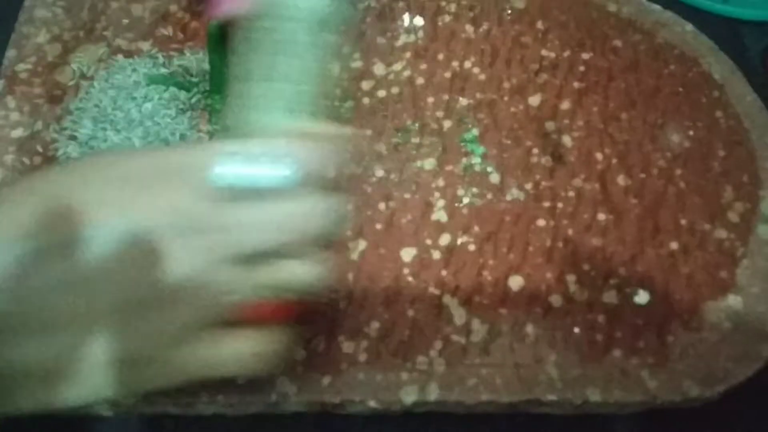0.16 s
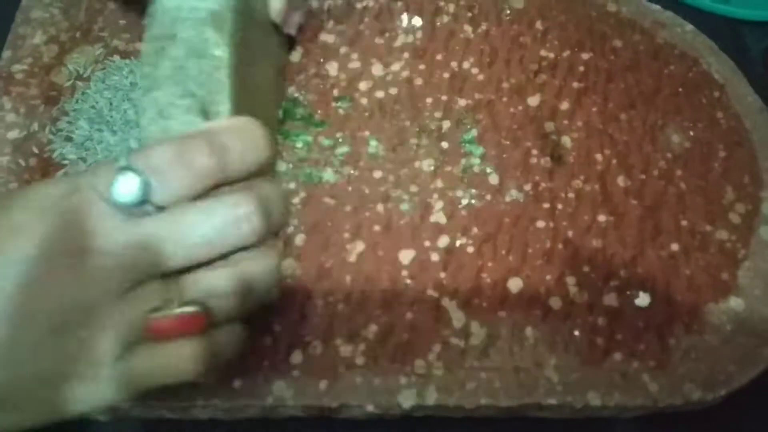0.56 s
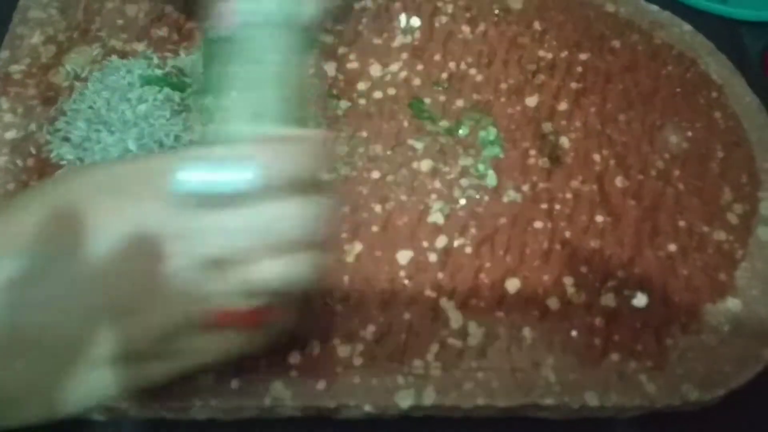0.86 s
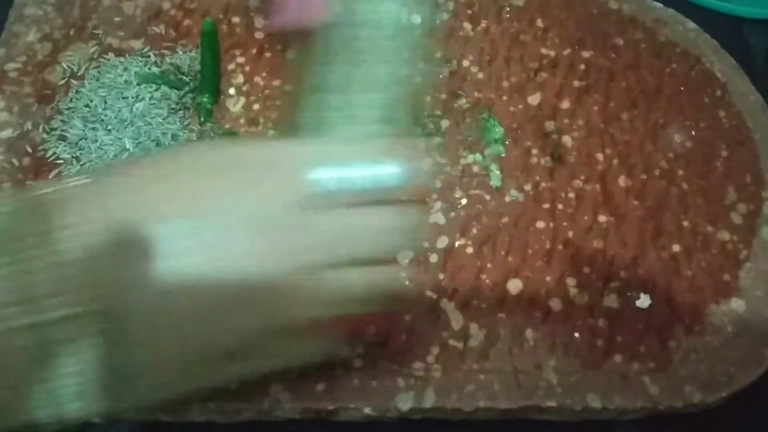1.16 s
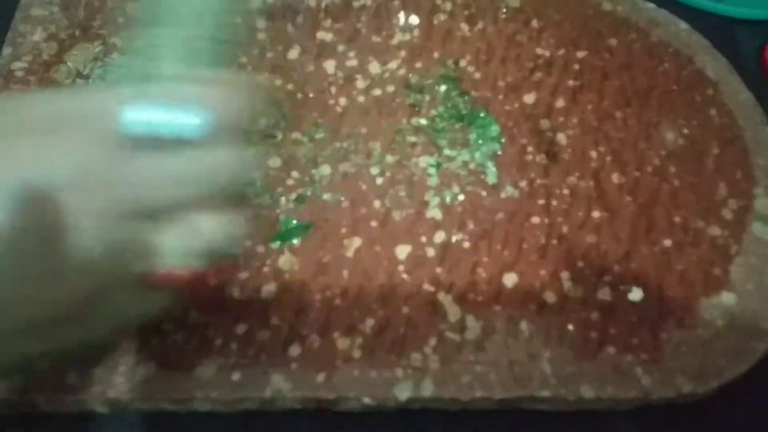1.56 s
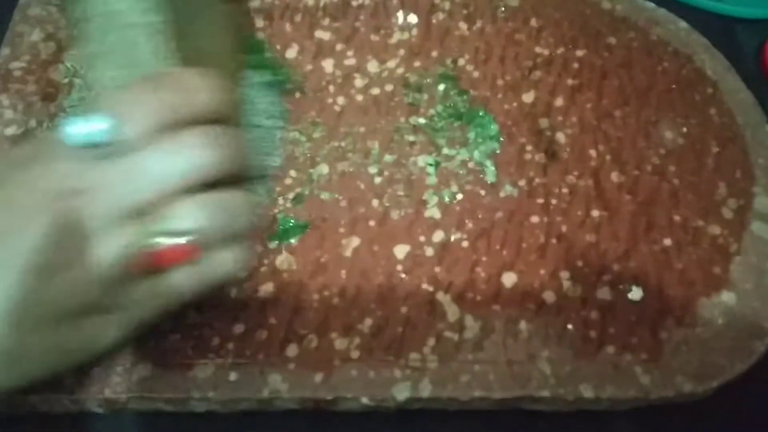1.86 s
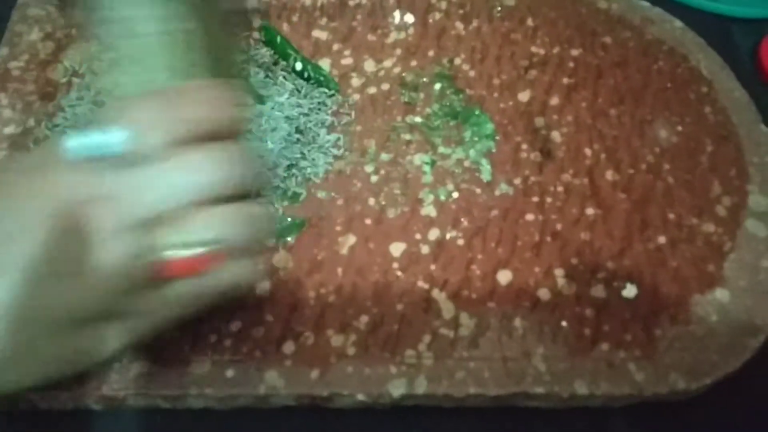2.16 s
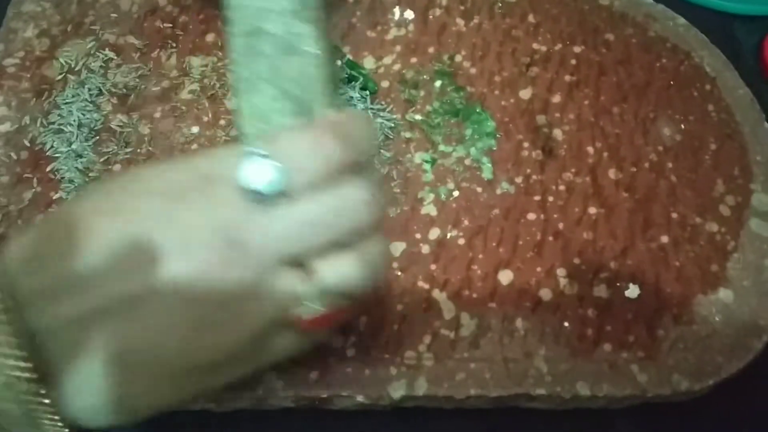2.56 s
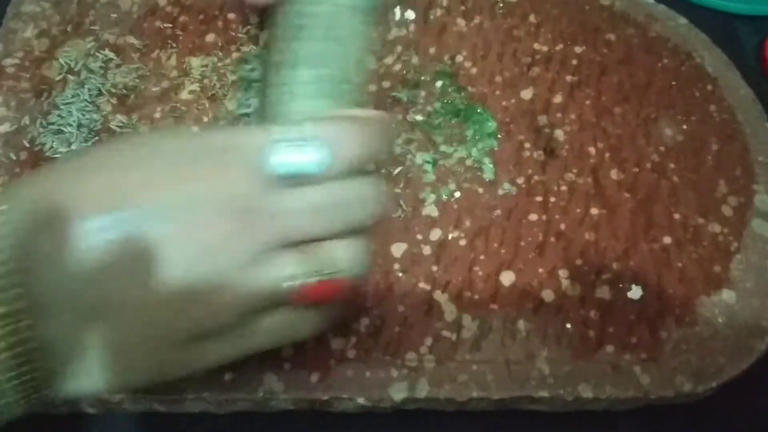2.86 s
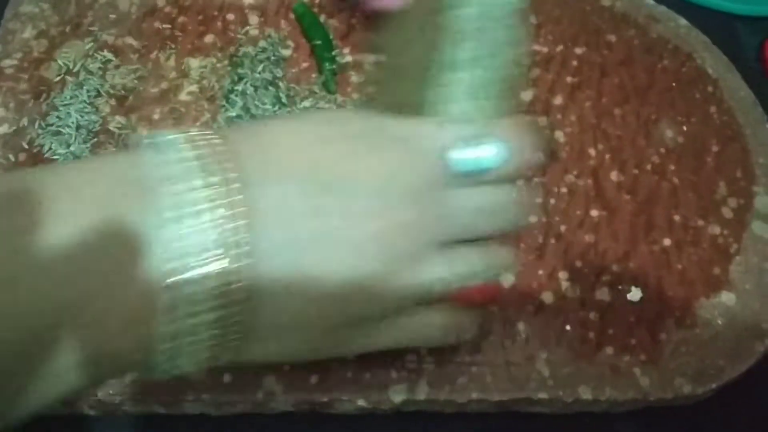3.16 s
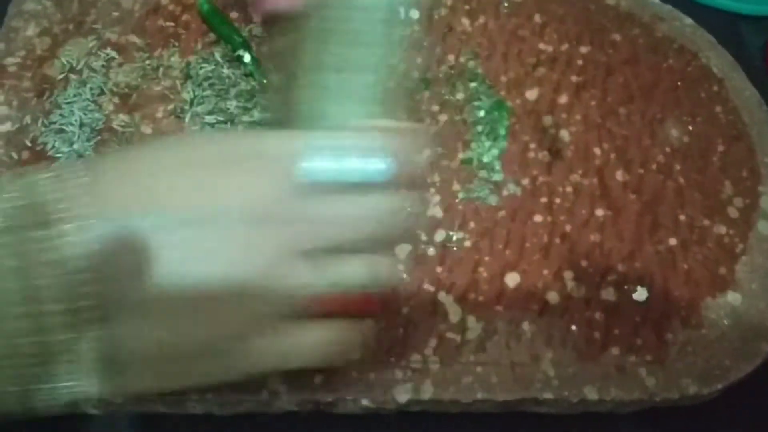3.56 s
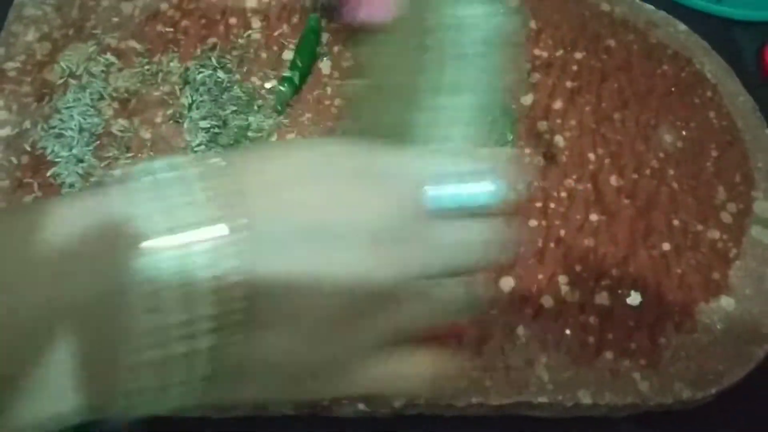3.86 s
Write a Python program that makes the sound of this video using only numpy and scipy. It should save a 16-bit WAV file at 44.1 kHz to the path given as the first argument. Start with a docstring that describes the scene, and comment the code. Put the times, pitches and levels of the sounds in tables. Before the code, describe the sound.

Quick, gritty strokes of stone on stone crush spices in a small, faintly humming kitchen. After a short break and a clack, the grinding carries on, stumbles into soft thuds, then grows raspier as seeds crack.

```python
"""A stone muller grinds spices on a stone slab in a small kitchen, over a low room hum and rumble.
From the start each stroke swells and fades: grit rasps, the stones ring faintly, the slab thrums on the
counter, and on thinly covered stone the muller chatters and knocks. Near 1.5 s it is lifted, then set
down with a clack. The grinding resumes, stumbles into soft thuds and chatter around 2.5 s,
and ends in firmer, raspier strokes with seeds cracking under the stone."""
import sys
import numpy as np
from scipy import signal
from scipy.fft import rfft, irfft, next_fast_len
from scipy.io import wavfile
from scipy.ndimage import uniform_filter1d

SR = 44100
rng = np.random.default_rng(int(sys.argv[2]) if len(sys.argv) > 2 else 0)


def master_out(mix):
    """Clip the mix to full scale and print it as 16-bit PCM to the path in sys.argv[1]."""
    frames = np.transpose(np.atleast_2d(mix))
    ceiling = np.clip(frames, -1, 1)
    pcm = np.round(ceiling * 32767).astype(np.int16)
    wavfile.write(sys.argv[1], SR, pcm)


N = 176400

# room tone spectrum: f/Hz, relative level/dB
ROOM_TONE_EQ = [(15, -17.5), (28, 19), (45, -21.5), (65, -40), (88, 10.5), (130, -14), (210, -8),
                (320, -34), (650, -18), (1500, -27.5), (3000, -36.5), (9000, -29), (16000, -44)]
# deep rumble spectrum: f/Hz, relative level/dB
RUMBLE_EQ = [(10, -40), (22, -23), (29, -12), (42, -30), (70, -13), (200, -41)]
# rise and fall of the rumble: t/s, level/dB
RUMBLE_FADER = [(0, -52), (1.4, -53), (1.6, -61), (2.3, -53), (2.58, -43), (2.8, -51), (3.3, -51.5),
                (4, -55)]
# kitchen reverb decay: f/Hz, t60/s
REVERB_DECAY = [(150, 0.56), (800, 0.46), (2000, 0.12), (6000, 0.12), (15000, 0.13)]
# muller strokes: start/s, end/s, top speed at/fraction of stroke, rasp/dB, ring/dB, thrum/dB, chatter/dB
MULLER_STROKES = [(-.12, 0.067, .5, -30.5, -46, -38, -51), (0.056, 0.228, 0.31, -33.5, -36.5, -39, -32.5),
                  (0.224, 0.416, 0.38, -25, -43.5, -38, -41.5), (0.407, 0.57, 0.41, -32, -46, -44, -38),
                  (0.536, 0.758, 0.52, -27.5, -42.5, -41, -73), (0.74, 0.906, 0.43, -27.5, -36, -44, -32),
                  (0.895, 1.085, 0.46, -27, -39, -36, -68), (1.064, 1.232, 0.41, -28, -35, -41.5, -31),
                  (1.21, 1.404, 0.48, -26.5, -40.5, -37.5, -44),
                  (1.397, 1.456, 0.42, -39.5, -42.5, -57, -38), (1.694, 1.935, 0.7, -28.5, -36, -41, -74),
                  (1.94, 2.091, 0.5, -28, -37.5, -40.5, -72), (2.098, 2.263, 0.36, -23, -32.5, -35.5, -74),
                  (2.252, 2.401, 0.48, -28, -37, -36.5, -62), (2.407, 2.633, 0.24, -26, -34.5, -39, -70),
                  (2.5, 2.572, 0.48, -47, -39, -56, -29.5), (2.54, 2.733, 0.57, -44.5, -42.5, -54, -49),
                  (2.723, 2.909, 0.43, -37.5, -48.5, -44.5, -51), (2.916, 3.092, 0.63, -21, -38, -37, -73),
                  (3.092, 3.275, 0.54, -27, -40, -38, -67), (3.276, 3.451, 0.53, -21.5, -38, -35, -76),
                  (3.434, 3.635, 0.61, -29, -43, -38, -79), (3.626, 3.82, 0.39, -21.5, -37.5, -36, -83),
                  (3.797, 4.016, 0.28, -28, -41.5, -39.5, -59)]
# slab shaking on the counter: f/Hz, relative level/dB
THRUM_EQ = [(40, -31), (68, -11.5), (88, 0.5), (115, -11.5), (165, -6), (208, 1.5), (232, -2), (265, -0.5),
            (300, -3.5), (340, -19), (405, -9.5), (520, -21), (710, -19), (1000, -23), (2000, -28)]
# hollow scrape of bare stone: f/Hz, relative level/dB
CHATTER_EQ = [(100, -22), (350, -17), (600, -4), (820, 4), (1000, -4), (1300, -14.5), (1600, -11.5),
              (2000, -21.5), (2800, -13.5), (4000, -17), (7000, -14)]
# ringing modes of the stones: f/Hz, relative level/dB, t60/s
STONE_MODES = [(199, -34, 0.053), (432, -26, 0.035), (450, -23.5, 0.024), (739.5, -25.5, 0.072),
               (854, -25.5, 0.058), (1142, -11, 0.011), (1276, -18.5, 0.019), (1600, -0.5, 0.024),
               (1765, 2, 0.0088), (1787, -21.5, 0.02), (2200, -14, 0.027), (2966, -2.5, 0.016),
               (4100, -6, 0.0055), (4730, -3.5, .013)]
# stereo width of the ring: f/Hz, lag of the right side/rad
RING_LAG = [(0, -3.5), (800, 1), (1150, -0.1), (1500, -2), (1720, -1.5), (2000, -1.7), (2300, 1.6),
            (3100, 2.1), (4300, -0.9)]
# how rubbing feeds the modes: f/Hz, relative level/dB
RUB_EQ = [(200, -6), (700, 8), (1100, -3.5), (1600, -0.5), (1900, 0.5), (2220, 5), (2700, -4.5),
          (4500, -0.5)]
# stone-on-stone hits, long contacts being soft thuds: t/s, level/dB, contact time/s
STONE_HITS = [(0.085, -21, 0.00032), (0.4448, -20.5, 0.00019), (0.4726, -8.5, 0.00017),
              (0.4747, -7.5, 0.00012), (.4776, -24, 0.00018), (0.4883, -13, 0.00011),
              (0.4954, -40, 0.000088), (0.5674, -12.5, 0.000044), (.789, -14, 0.00011),
              (1.2925, -9.5, 0.00026), (1.3606, -15.5, 0.00024), (1.6879, -2, 0.000084),
              (2.149, -24, 0.00035), (2.159, -20.5, 0.00065), (2.445, -22.5, 0.0007),
              (2.472, -16.5, 0.00065), (2.474, -28, 0.0006), (2.513, -16, 0.00014), (2.794, -21, 0.00011),
              (2.9491, -16, 0.000011), (3.858, -23, 0.00014)]
# skid after a hit: f/Hz, relative level/dB
SKID_EQ = [(100, -16.5), (350, -9), (700, 4.5), (1200, -2), (1650, 2), (2200, -3.5), (3100, -7.5),
           (4500, -29), (8000, -34)]
# seeds cracking: t/s, level before the rasp EQ/dB
SEED_CRACKS = [(0.228, -27.5), (.431, -26), (0.566, -20), (0.94, -29), (1.378, -26), (1.6843, -24),
               (1.799, -34), (1.861, -14), (2.1175, -25), (2.4308, -22.5), (2.4455, -24), (2.7177, -19),
               (2.731, -34), (2.761, -38), (2.928, -29), (2.9473, -15.5), (3.007, -9.5), (3.1234, -21),
               (3.174, -28.5), (3.3125, -19.5), (3.384, -28), (3.649, -20.5), (3.8533, -19), (3.942, -22.5)]
# spectrum of crushed grit: f/Hz, relative level/dB
RASP_EQ = [(300, -42), (1200, -20), (2700, -18.5), (3400, -12), (4300, -3), (5300, -10), (6500, -4),
           (8000, -0.5), (9700, 4), (11000, -2), (12800, -8), (15800, -5.5)]
# stereo lean of the rasp: f/Hz, left minus right/dB
RASP_PAN = [(1000, 10.5), (4400, -1.5), (8000, -3.5), (10000, 1), (15000, 1)]

GRIT_PER_S, BUMPS_PER_S, SKIPS_PER_S = 18000, 2500, 1100
BUMP_SPREAD_DB, SKIP_SPREAD_DB, SKIP_SHARED = 3.5, 2, 0.77


def amp(db):
    """Decibels to gain."""
    return 10 ** (np.asarray(db) / 20)


def unit(x):
    """Scales to an rms of one."""
    return x / np.sqrt(np.mean(x ** 2) + 1e-20)


def curve_at(points, hz):
    """Reads a table on a log-frequency axis."""
    f, value = np.transpose(points)
    return np.interp(np.log(hz + 1), np.log(f + 1), value)


def add(mix, s, sound):
    """Mixes a sound in at s seconds."""
    part = mix[..., round(s * SR):][..., :sound.shape[-1]]
    part += sound[..., :part.shape[-1]]


def convolve(x, response):
    """Plays a signal through a response, channel by channel."""
    return signal.fftconvolve(np.atleast_2d(x), np.atleast_2d(response), axes=1)[:, :N]


def eq(x, points, size=4096):
    """Minimum-phase EQ along the given curve."""
    log_gain = np.log(amp(curve_at(points, abs(np.fft.fftfreq(size, 1 / SR)))))
    response = np.fft.ifft(np.exp(signal.hilbert(log_gain).conj())).real
    return convolve(x, response[:size // 2])


def wobble(smooth_s):
    """Smooth random modulation with an rms of one."""
    return unit(signal.fftconvolve(rng.standard_normal(N), np.hanning(int(2 * smooth_s * SR)), "same"))


def grains(per_s, spread_db):
    """Random clicks of either sign, many small and a few large."""
    size = amp(spread_db * np.minimum(rng.exponential(1, N), 5))
    return unit(size * rng.choice([-1, 1], N) * (rng.random(N) < per_s / SR))


def stereo_grains(per_s, spread_db, shared):
    """Clicks with a share of their power in the centre."""
    left, right, centre = (grains(per_s, spread_db) for _ in range(3))
    return np.sqrt(1 - shared) * np.array([left, right]) + np.sqrt(shared) * centre


def room_tone(air_db=-50.5, mono_below_hz=600):
    """A bed of steady humming noise, mono in the bass, over a deep rumble."""
    spectrum = rfft(rng.standard_normal((2, N)))
    bass = np.fft.rfftfreq(N, 1 / SR) < mono_below_hz
    air = unit(eq(irfft(np.where(bass, spectrum[0], spectrum), N), ROOM_TONE_EQ))
    rumble = unit(eq(rng.standard_normal(N), RUMBLE_EQ, size=16384))
    rumble_db = np.interp(np.arange(N) / SR, *np.transpose(RUMBLE_FADER))
    return amp(air_db) * air + amp(rumble_db) * rumble


def kitchen_reverb(send, predelay_s=0.0041, mono_below_hz=900):
    """Kitchen reflections: sparse random taps, the treble dying first."""
    taps = rng.standard_normal((2, SR // 2)) * (rng.random((2, SR // 2)) < .1)
    hz, t, spectra = signal.stft(taps, SR, nperseg=256)
    tail = signal.istft(spectra * amp(-60 * t / curve_at(REVERB_DECAY, hz)[:, None]), SR)[1]
    tail = np.pad(tail, ((0, 0), (round(predelay_s * SR), 0)))
    bass = signal.sosfilt(signal.butter(2, mono_below_hz, fs=SR, output="sos"), tail[0])
    tail = bass + signal.sosfilt(signal.butter(2, mono_below_hz, "high", fs=SR, output="sos"), tail)
    return convolve(send, tail / np.linalg.norm(tail, axis=1, keepdims=True))


def stroke_envelope(levels_db, follow, swell_db=32.5, shape=2.406, edge_s=0.0065, pressure_db=1.3):
    """Strokes peak at top speed and drop follow * swell_db to the turn, under uneven hand pressure."""
    t, power = np.arange(N) / SR, np.zeros(N)
    for (start, end, top, *_), db in zip(MULLER_STROKES, levels_db):
        off_peak = abs(np.interp(t, [start, start + top * (end - start), end], [-1, 0, 1]))
        gate = np.clip(np.minimum(t - start, end - t) / edge_s + 1, 0, 1)
        power += (gate * amp(db - follow * swell_db * off_peak ** shape)) ** 2
    return np.sqrt(power) * amp(pressure_db * wobble(smooth_s=0.019))


def contact_drift(x, depth_db=3.5, width_hz=380, drift_s=.045, size=512):
    """Peaks and dips wander through the spectrum as the contact patch moves."""
    spectra = signal.stft(x, nperseg=size)[2]
    ripple = rng.standard_normal(spectra.shape[1:])
    for axis, width in enumerate((width_hz * size / SR, drift_s * SR / (size / 2))):
        for span in (width, width / 2):
            ripple = uniform_filter1d(ripple, round(span), axis)
    return unit(signal.istft(spectra * amp(depth_db * unit(ripple)))[1][:, :N])


def slab_thrum(levels_db):
    """The low end: the heavy slab shakes on the counter under each stroke."""
    body = unit(eq(grains(BUMPS_PER_S, BUMP_SPREAD_DB), THRUM_EQ))
    return body * stroke_envelope(levels_db, follow=0.73)


def muller_chatter(levels_db):
    """On bare patches the muller skips with a coarse, hollow scrape."""
    scrape = eq(stereo_grains(SKIPS_PER_S, SKIP_SPREAD_DB, SKIP_SHARED), CHATTER_EQ)
    return contact_drift(scrape) * stroke_envelope(levels_db, follow=1)


def stone_ring(contact_s, spread_db=2.5, detune=0.013):
    """The stones ring from one blow, a little differently at each spot; a longer contact is duller."""
    t = np.arange(SR // 8) / SR
    ring = np.zeros(len(t))
    for k, (hz, db, t60) in enumerate(STONE_MODES):
        decay = amp(db + spread_db * rng.standard_normal() - 60 * t / t60)
        pitch_hz = hz * (1 + detune * rng.standard_normal())
        ring += (-1) ** k * decay * np.sin(2 * np.pi * pitch_hz * t)
    force = t * np.exp(-t / contact_s)
    left = convolve(ring, force)[0, :len(t)]
    size = next_fast_len(2 * len(t))
    lag = curve_at(RING_LAG, np.fft.rfftfreq(size, 1 / SR))
    right = irfft(rfft(left, size) * np.exp(-1j * lag), size)[:len(t)]
    stereo = np.array([left, right])
    return stereo / abs(stereo).max()


def stone_rub(levels_db, contacts=3):
    """Fine bumps at several points of contact keep the stones ringing."""
    ring = sum(convolve(grains(BUMPS_PER_S / contacts, BUMP_SPREAD_DB), stone_ring(contact_s=.00007))
               for _ in range(contacts))
    return unit(eq(ring, RUB_EQ)) * stroke_envelope(levels_db, follow=0.92)


def muller_knocks(skid_db=-21, attack_s=.003, decay_s=0.028):
    """The muller rocks or drops onto the slab, each hit trailing a short, quieter skid."""
    hits, skid_level, t = np.zeros((2, N)), np.zeros(N), np.arange(SR // 4) / SR
    skid_shape = np.minimum(t / attack_s, 1) * np.exp(-t / decay_s)
    for s, db, contact_s in STONE_HITS:
        add(hits, s, amp(db) * stone_ring(contact_s))
        add(skid_level, s, amp(db + skid_db) * skid_shape)
    skid = unit(eq(stereo_grains(GRIT_PER_S, SKIP_SPREAD_DB, SKIP_SHARED), SKID_EQ))
    return hits + skid_level * skid


def spice_rasp(levels_db, clump_db=2, coarse_hz=5930, brighten=0.34, pivot_db=-35, crack_decay_s=0.0045):
    """Grit is crushed in small clumps of tiny clicks; now and then a whole seed cracks."""
    clumps = amp(clump_db * wobble(smooth_s=0.0094))
    grit = unit(contact_drift(stereo_grains(GRIT_PER_S, spread_db=3, shared=0.05)) * clumps)
    level = stroke_envelope(levels_db, follow=0.99)
    coarse = signal.sosfiltfilt(signal.butter(2, coarse_hz, fs=SR, output="sos"), grit)
    fine = grit - coarse
    # faster strokes add less coarse grit than fine, so they sound brighter
    coarse_gain = np.maximum(level / amp(pivot_db), .1) ** -brighten
    crushed = (fine + coarse * coarse_gain) * level
    t = np.arange(SR // 50) / SR
    for s, db in SEED_CRACKS:
        add(crushed, s, amp(db) * np.exp(-t / crack_decay_s) * rng.uniform(-1.07, 1, (2, len(t))))
    rasp = eq(crushed, RASP_EQ) / eq(grit, RASP_EQ).std()
    lean_db = curve_at(RASP_PAN, np.fft.rfftfreq(N, 1 / SR)) / 2
    return irfft(rfft(rasp) * amp([lean_db, -lean_db]), N)


def scene():
    """The mix: rasp, ring and clatter feed the reverb; thrum and room tone stay dry."""
    rasp_db, ring_db, thrum_db, chatter_db = np.transpose(MULLER_STROKES)[3:]
    rasp = spice_rasp(rasp_db)
    ring = stone_rub(ring_db)
    clatter = muller_chatter(chatter_db) + muller_knocks()
    reverb = kitchen_reverb(amp(-4) * rasp + amp(-6.5) * ring + amp(-11.5) * clatter)
    return rasp + ring + clatter + slab_thrum(thrum_db) + reverb + room_tone()


def record(dry):
    """A steep high cut at 15.9 kHz on the whole mix."""
    high_cut = signal.firwin(511, 15900, window=("kaiser", 9), fs=SR)
    return signal.oaconvolve(dry, high_cut[None], "same")


dry = scene()
out = record(dry)
master_out(out)
```